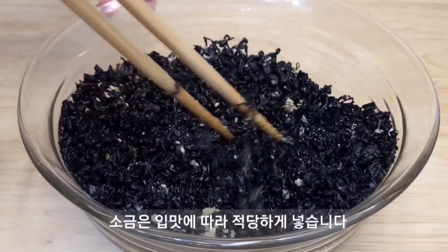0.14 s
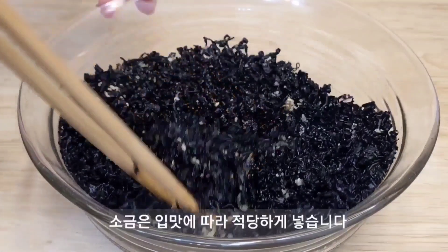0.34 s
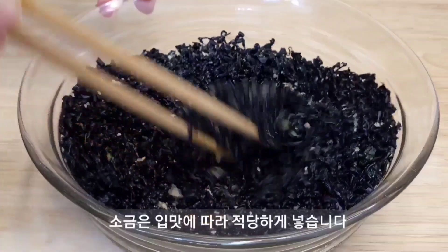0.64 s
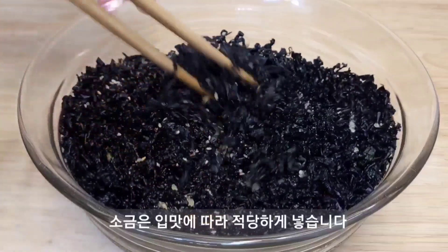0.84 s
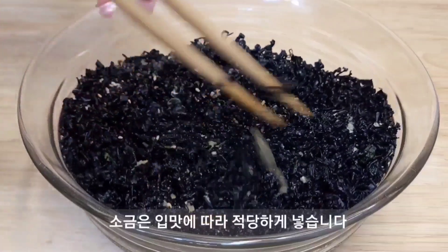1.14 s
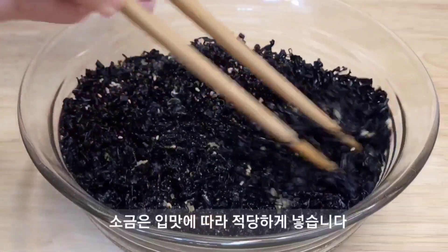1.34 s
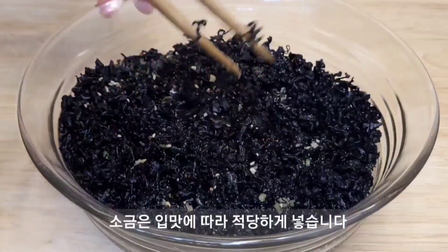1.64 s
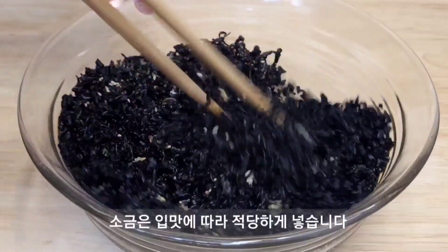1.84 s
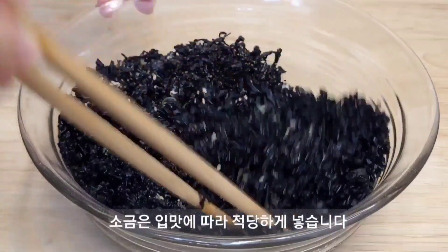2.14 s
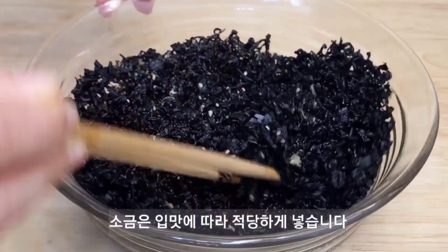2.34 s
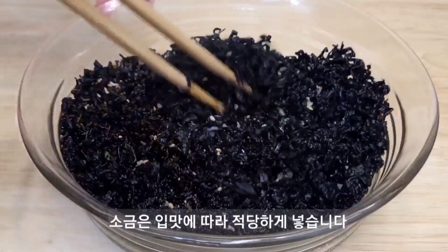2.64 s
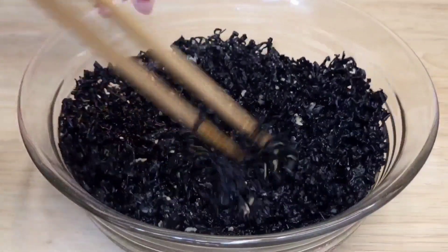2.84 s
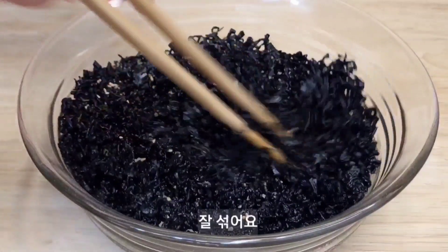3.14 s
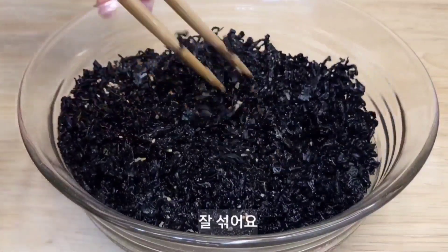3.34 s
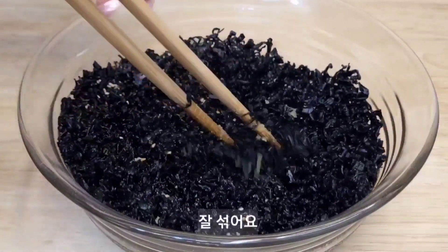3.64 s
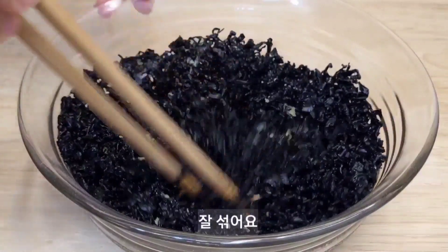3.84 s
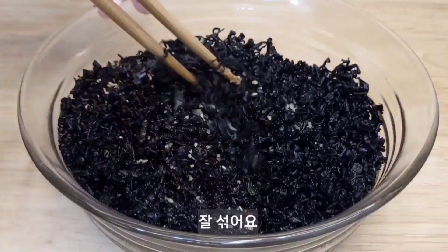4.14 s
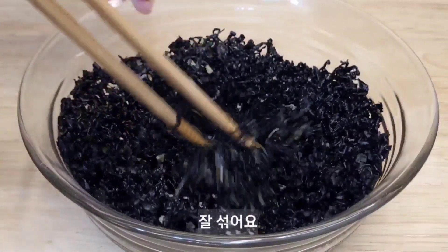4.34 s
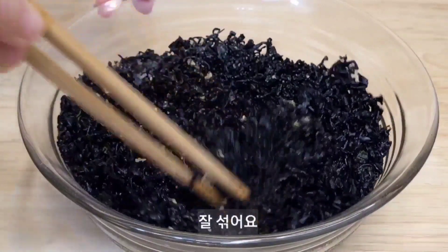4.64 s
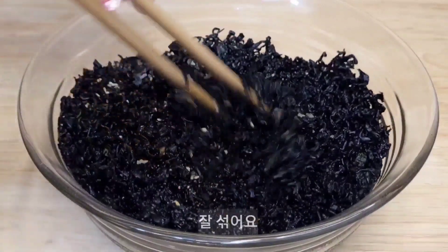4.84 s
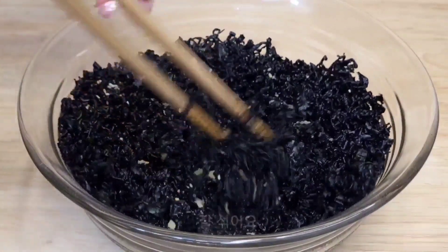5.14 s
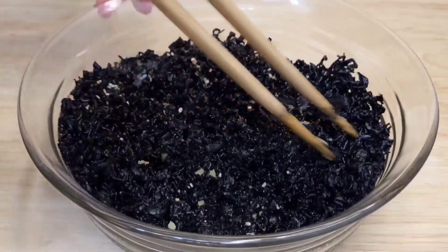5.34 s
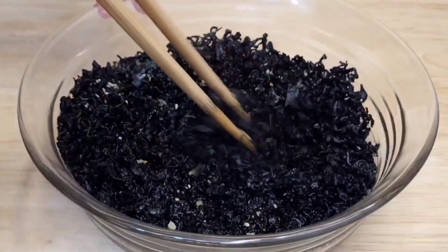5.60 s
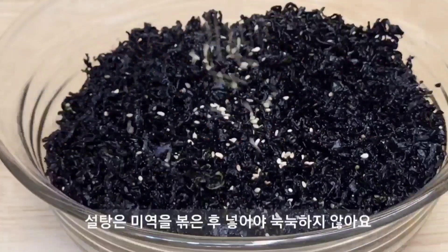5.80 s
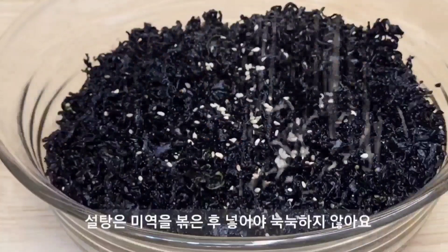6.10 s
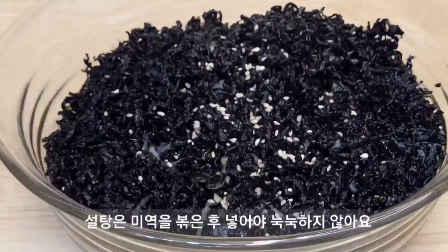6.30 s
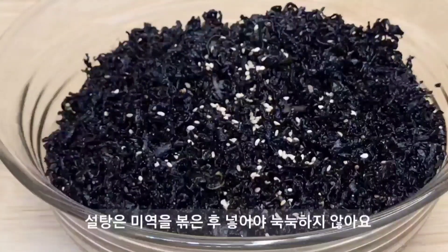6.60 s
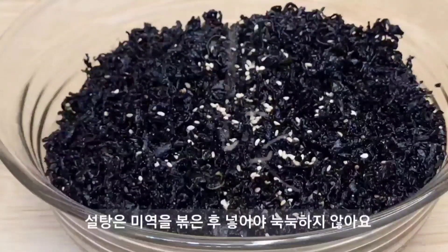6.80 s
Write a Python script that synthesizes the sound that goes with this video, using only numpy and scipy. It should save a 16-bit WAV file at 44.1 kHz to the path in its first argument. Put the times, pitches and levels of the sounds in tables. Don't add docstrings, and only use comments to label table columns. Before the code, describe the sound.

Wooden chopsticks stir brittle dried seaweed in a glass bowl with crackling rustles, clicks and thuds, then fade before a faint sugar patter.

```python
import sys
import numpy as np
from scipy import signal
from scipy.fft import rfft, irfft, next_fast_len
from scipy.io import wavfile
from scipy.ndimage import uniform_filter1d

SR = 44100
rng = np.random.default_rng(int(sys.argv[2]) if len(sys.argv) > 2 else 0)


def makeup_ratio(level_db):
    decades = np.asarray(level_db, float) / 20
    return 10 ** decades


def transcribe(u):
    v = np.clip(np.atleast_2d(u).T, -1, 1)
    q = np.round(v * 32767).astype(np.int16)
    wavfile.write(sys.argv[1], SR, q)


N = 306936


def rms_one(x):
    return x / np.sqrt(np.mean(x ** 2) + 1e-20)


def seconds():
    return np.arange(N) / SR


def scene_two():
    return seconds() > 5.73


def in_time(rows):
    s, *columns = np.transpose(rows)
    return [np.interp(seconds(), s, column) for column in columns]


def at_hz(points, hz):
    point_hz, value = np.array(points).T[:2]
    return np.interp(np.log(hz), np.log(point_hz), value)


def drift(rate):
    r = np.exp(-80 * np.pi * rate / SR)
    slow = signal.lfilter([1], [1, -2 * r, r * r], rng.standard_normal(N // 40 + 2002))[2000:]
    return np.interp(np.arange(N) / 40, np.arange(len(slow)), rms_one(slow))


def resonate(x, hz, width_hz):
    r = np.exp(-np.pi * width_hz / SR)
    gain = (1 - r * r) / 2
    return signal.lfilter([gain, 0, -gain], [1, -2 * r * np.cos(2 * np.pi * hz / SR), r * r], x)


def band_noise_filter(x, low_hz, high_hz):
    return signal.sosfilt(signal.butter(2, [low_hz, high_hz], "band", fs=SR, output="sos"), x)


def grains(per_s, spread_db):
    sizes = makeup_ratio(spread_db * np.minimum(rng.exponential(1, N), 5)) * rng.choice([-1, 1], N)
    return rms_one(sizes * (rng.random(N) < per_s / SR) + 1e-18)


def coloured(pair, spectrum, patchy_db, rate, later=None):
    out = 0
    edges = 25 * 2 ** np.arange(0, 9.5, 1 / 3)
    late = scene_two()
    for k, (low, high) in enumerate(zip(edges, edges[1:])):
        if high > spectrum[0][0] and low < spectrum[-1][0]:
            band = band_noise_filter(pair[k % 2], low, high)
            first_db, second_db = [at_hz(s, np.sqrt(low * high)) for s in (spectrum, later or spectrum)]
            out = out + band * makeup_ratio(np.where(late, second_db, first_db) + patchy_db * drift(rate))
    return np.where(late, out / np.std(out[late]), out / np.std(out[~late]))


def pings(at_s, db, hz, cycles):
    age = np.arange(320, dtype=np.float32) / SR
    hz = hz.astype(np.float32)[:, None]
    decay = np.exp(-hz / cycles * age) * (1 - age / age[-1])
    shapes = makeup_ratio(db)[:, None] * decay * np.sin(2 * np.pi * hz * age)
    where = (at_s * SR).astype(int)[:, None] + np.arange(len(age))
    return np.bincount(where.ravel(), shapes.ravel(), N + len(age))[:N]


def strikes(rows, length_s):
    out = np.zeros(N + SR)
    age = np.arange(SR // 10) / SR
    shapes = rng.standard_normal((len(rows), len(age))) * np.exp(-age / length_s)
    for (s, db, *_), shape in zip(rows, shapes):
        out[round(s * SR):][:len(age)] += makeup_ratio(db) * shape / np.max(np.abs(shape))
    return out[:N]


def louder(a_db, b_db):
    return np.logaddexp(a_db / 4.343, b_db / 4.343) * 4.343


def bursts(start, end, start_db, end_db, rise_db_s, fall_db_s):
    bite_s = 0.051
    s = np.arange(0, N + 64, 64)[:, None] / SR
    progress = np.clip((s - start) / np.maximum(end - start, 1e-3), 0, 1)
    held = start_db + (end_db - start_db) * progress
    lead = np.maximum(start - s, 0)
    db = held - rise_db_s * lead * (1 + lead / bite_s) - fall_db_s * np.maximum(s - end, 0)
    total_db = 10 * np.log10(np.sum(10 ** (db / 10), axis=1) + 1e-14)
    return np.interp(seconds(), s[:, 0], total_db)


# start in seconds, end in seconds, crackle at start in dB,
# crackle at end in dB, brightness in dB.
STROKES = [(0.0, 0.074, -50, -44, -9), (0.093, 0.227, -42.5, -46.5, -6), (0.476, 0.616, -54, -35.5, -6.5),
           (0.748, 0.806, -54, -54.5, -6.5), (0.98, 1.11, -56.5, -48.5, -8), (1.123, 1.278, -42, -61, -7.5),
           (1.423, 1.557, -57, -43.5, -5), (1.568, 1.661, -43.5, -44, -7), (1.904, 2.018, -42, -41.5, -7.5),
           (2.258, 2.378, -45, -35.5, -7), (2.445, 2.473, -56, -51.5, -12.5),
           (2.565, 2.667, -50, -57.5, -4.5), (2.747, 2.852, -56.5, -45, -8),
           (2.882, 2.998, -39.5, -52.5, -7), (3.212, 3.378, -42.5, -44.5, -5.5),
           (3.574, 3.612, -45, -41.5, -8.5), (3.637, 3.751, -39.5, -47.5, -7.5),
           (3.932, 4.011, -54.5, -41.5, -6.5), (4.11, 4.142, -58, -60.5, -6.5),
           (4.29, 4.481, -55, -51, -7.5), (4.74, 4.805, -56, -46, -6), (4.9, 5.048, -70, -76.5, -6),
           (5.137, 5.234, -66.5, -60.5, -10.5), (5.497, 5.617, -91, -73, -5)]
# start in seconds, end in seconds, level in dB.
SLIDES = [
    (0, .04, -51.5),
    (.165, .19, -48.5),
    (0.487, 0.61, -47),
    (1.026, 1.04, -60),
    (1.465, 1.474, -45),
    (1.974, 2.01, -54.5),
    (2.247, 2.322, -47.5),
    (2.38, 2.403, -58),
    (3.195, 3.3, -55),
]
# time in seconds, push on the bowl in dB, sway of the table in dB.
DIGS = [(.12, -56.5, -52), (0.628, -32.5, -42.5), (1.14, -75, -52), (1.6, -59, -60), (1.998, -45, -43.5),
        (2.387, -38, -46), (2.919, -63, -48.5), (3.25, -64, -56), (3.651, -62, -47.5), (4.023, -38, -50),
        (4.4, -62.5, -56), (4.821, -53, -58), (5.23, -78, -69)]


def hand():
    start, end, start_db, end_db, bright_db = np.transpose(STROKES)
    stroke = bursts(start, end, start_db, end_db, rise_db_s=356, fall_db_s=207)
    settle_db = end_db - 21.5
    settle = bursts(end, end, settle_db, settle_db, rise_db_s=356, fall_db_s=30.5)
    bright = np.interp(seconds(), (start + end) / 2, bright_db + 6.5)
    s, push_db, sway_db = np.transpose(DIGS)
    push = bursts(s, s, push_db, push_db, rise_db_s=321.5, fall_db_s=246)
    sway_s = s + 0.007
    sway = bursts(sway_s, sway_s, sway_db, sway_db, rise_db_s=128, fall_db_s=177)
    start, end, db = np.transpose(SLIDES)
    slide = bursts(start, end, db, db, rise_db_s=397, fall_db_s=306)
    return (louder(stroke, settle), bright, louder(push, stroke - 16),
            louder(slide, stroke - 17.5), louder(sway, stroke - 14))


def ringing_flakes(count=14000):
    when, pitch, size = rng.random((count, 3)).T
    size_db = -2.5 * np.log(size + 0.081)
    return rms_one(pings(when * N / SR, size_db, 2500 + 13000 * pitch, cycles=58.0))


# time in seconds, best excited pitch in Hz.
CONTACT = [(0.0, 3900), (0.57, 4950), (0.63, 4060), (1.09, 5080), (1.15, 4270), (2.38, 5170), (2.49, 4190),
           (2.55, 5420), (2.96, 4320), (3.97, 5260), (4.08, 4130), (4.26, 5370), (4.46, 4040), (4.71, 5470),
           (4.89, 3980), (5.12, 5190), (5.17, 4730), (5.66, 4740)]
# frequency in Hz, width in Hz, level in dB.
GLASS = [(2988, 58, -6), (4088, 73, 0), (4474, 48, -5.5), (5805, 330, -3.5), (6660, 200, -8),
         (8120, 340, -11.5)]


def glass(force, favour_db):
    best_hz, = in_time(CONTACT)
    out = 0
    for k, (hz, width, db) in enumerate(GLASS):
        near = np.exp(-(np.log(hz / best_hz) / 0.19) ** 2)
        drive = force * makeup_ratio(favour_db * near + 0.5 * drift(3.4))
        out = out + (-1) ** k * makeup_ratio(db) * resonate(drive, hz, width)
    return out


# frequency in Hz, density in dB per Hz.
CRACKLE = [(760, -69), (1300, -33), (1550, -3), (1690, -11), (2010, -15.5), (2960, -5.5), (3560, -2.5),
           (4120, -3.5), (5020, -9.5), (5810, -4.5), (7850, -4), (9100, -6.5), (11400, -15.5), (14400, -21)]
# frequency in Hz, width in Hz, level in dB.
RUBBED = [(1709, 29, -0.5), (2930, 37, -5.5), (4593, 70, -4.5)]


def stirring(crackle_db, bright_db, rub_db):
    clumps = makeup_ratio(1.04 * drift(40.0))
    flakes = ringing_flakes()
    snaps = [(grains(8000.0, spread_db=2.5) + makeup_ratio(-9) * flakes) * clumps for _ in range(2)]
    rustle = coloured(snaps, CRACKLE, patchy_db=1.9, rate=8.9)
    rustle = rustle + makeup_ratio(-5.5) * rms_one(glass(snaps[0], favour_db=9.0))
    top = signal.sosfilt(signal.butter(4, 7200, "high", fs=SR, output="sos"), rustle)
    body = makeup_ratio(crackle_db - .3) * (rustle - top)
    body = body + makeup_ratio(crackle_db + bright_db - .3) * rms_one(top)
    sliding = makeup_ratio(rub_db + 20) * snaps[1]
    return body + sum(makeup_ratio(db) * resonate(sliding, hz, width) for hz, width, db in RUBBED)


# frequency in Hz, width in Hz, level in dB.
TABLE = [(128, 11.3, 1), (216.4, 14, -2), (241, 24, -5), (368, 13, -3), (467.6, 12, 2.5), (600, 70, -13),
         (882.4, 43, -5.5), (1028, 11.7, -7), (1085, 7, -3.5), (1131, 120, -12.5)]
# time in seconds, peak in dB.
KNOCKS = [
    (0.598, -5.5),
    (0.612, -37.5),
    (1.117, -48),
    (1.972, -33),
    (2.374, -54),
    (3.586, -41),
    (4.009, -18.5),
    (4.81, -55),
]


def table_modes(force):
    return sum((-1) ** k * makeup_ratio(db) * resonate(force, hz, width) for k, (hz, width, db) in enumerate(TABLE))


def table(push_db):
    slips = grains(1500.0, spread_db=4.0)
    blows = strikes(KNOCKS, 0.025)
    hard = np.clip((push_db + 70.5) / 15, 0, 1)
    soft = band_noise_filter(slips, 150, 1500)
    rocking = hard * rms_one(table_modes(slips)) + makeup_ratio(9) * (1.2 - hard) * soft
    return signal.lfilter([.2], [1, -.8], makeup_ratio(push_db + 2.0) * rocking + makeup_ratio(7.0) * table_modes(blows))


# time in seconds, level in dB.
ROOM_LEVEL = [
    (0, -59.5),
    (3.9, -61),
    (4.3, -66),
    (4.7, -70),
    (5.0, -73.5),
    (5.68, -82.5),
]
# time in seconds, sugar patter in dB, room in dB.
SUGAR = [
    (5.79, -97.5, -79.5),
    (5.93, -69.5, -59.5),
    (6.092, -66, -60.5),
    (6.2, -68.5, -62),
    (6.32, -69, -59),
    (6.4, -71.5, -58.5),
    (6.96, -73.5, -60),
]
# frequency in Hz, density in dB per Hz.
QUIET_ROOM = [(15, -31), (25, -13), (43, -3), (106, 1.5), (185, -8), (278, -6), (486, -11), (1300, -21),
              (2500, -31), (3250, -43.5), (5500, -120)]
# frequency in Hz, density in dB per Hz.
ROOM = [(15, -40), (25, -14.5), (86, 1), (193, -14.5), (262, -8.5), (294, -15), (324, -11), (515, -20),
        (612, -19.5), (954, -25.5), (2500, -36), (3250, -72), (5500, -120)]


def rumble(sway_db):
    _, room_db = in_time(SUGAR)
    quiet_db, = in_time(ROOM_LEVEL)
    level = np.where(scene_two(), makeup_ratio(room_db + 1.6), makeup_ratio(louder(quiet_db, sway_db) + 2.33))
    return level * coloured(rng.standard_normal((2, N)), QUIET_ROOM, patchy_db=3.5, rate=9.0, later=ROOM)


# frequency in Hz, density in dB per Hz.
PATTER = [(590, -34.5), (1000, -11.5), (3460, -5.5), (3980, -5), (5810, -5), (7150, -7), (14900, -8),
          (15600, -10)]


def hiss_and_sugar():
    patter_db, _ = in_time(SUGAR)
    fader, = in_time(FADER)
    sugar = [.7 * rng.standard_normal(N) + .45 * grains(2500.0, spread_db=4.0) for _ in range(2)]
    bright = coloured(sugar, PATTER, patchy_db=2.0, rate=17.0)
    return np.where(scene_two(), makeup_ratio(patter_db + 3.0), makeup_ratio(-75.5) * fader) * bright


# time in seconds, peak in dB, ringing frequency in Hz.
TICKS = [(0.0702, -30, 4280), (0.5984, -26, 4050), (0.6144, -24, 4070), (1.1084, -28, 4510),
         (1.4115, -44, 4500), (1.4696, -31, 4500), (1.9016, -31, 4510), (2.2308, -39, 4500),
         (2.2468, -35, 4490), (2.2618, -28, 4820), (2.2674, -28, 4250), (2.3281, -26, 5920),
         (2.3444, -27, 6190), (2.3615, -25, 5750), (2.3755, -21, 4010), (2.5701, -26, 5880),
         (3.5404, -41, 5820), (3.5964, -28, 3630), (3.9539, -28, 5660), (4.0103, -25, 4060),
         (4.7456, -39, 5710)]


def ticks():
    s, db, hz = np.transpose(TICKS)
    crack = band_noise_filter(strikes(TICKS, .0006), 3000, 11000)
    return makeup_ratio(-3) * crack + pings(s, db - 9, hz, cycles=22.0)


def kitchen(x):
    t60_s = 0.12
    age = np.arange(SR // 2) / SR
    tails = rng.standard_normal((2, len(age))) * makeup_ratio(-60 * age / t60_s) * (age > .004)
    tails = signal.lfilter([.5], [1, -.55], tails)
    return signal.fftconvolve(x[None], tails / np.sqrt(np.sum(tails[0] ** 2)), axes=1)[:, :N]


# time in seconds, frequency in Hz, level in dB.
MOTOR = [
    (1.05, 289, -120),
    (1.1, 287, -83),
    (1.14, 291.2, -60.5),
    (1.7, 295, -62),
    (2.2, 293.4, -67.5),
    (2.35, 308, -104),
    (2.5, 305, -120),
]


def motor():
    hz, db = in_time(MOTOR)
    level = makeup_ratio(db + 4.0 + 0.61 * drift(17.0))
    return level * np.sin(2 * np.pi * np.cumsum(hz + 0.3 * drift(5.7)) / SR)


# time in seconds, peak in dB, frequency in Hz.
BUMPS = [(5.878, -48, 76.6), (5.929, -59, 85), (6.0, -49, 82.5), (6.239, -48.5, 64), (6.301, -42.5, 84),
         (6.439, -48, 88), (6.474, -40.5, 90), (6.578, -54, 91), (6.638, -41.5, 77.4), (6.732, -41, 89.7),
         (6.797, -45.5, 80.7), (6.907, -48.5, 73.6)]


def bumps():
    out = np.zeros(N + SR)
    age = np.arange(SR // 5) / SR
    envelope = (1 - np.exp(-age / 0.0059)) * np.exp(-age / 0.015)
    for s, db, hz in BUMPS:
        out[round(s * SR):][:len(age)] += makeup_ratio(db + 2.5) * envelope * np.sin(2 * np.pi * hz * age)
    return out[:N]


# frequency in Hz, likeness from 0 to 1.
LIKENESS = [(60, .99), (1000, .985), (4500, .98), (8000, .94), (13000, .8)]


def microphones(x, tilt_db):
    size = next_fast_len(N + SR)
    hz = np.maximum(np.arange(size // 2 + 1) * SR / size, 10)
    alike = np.clip(at_hz(LIKENESS, hz), 0, .999)
    scatter = rng.standard_normal(12000) * np.exp(-np.arange(12000) / 2000)
    side = rfft(scatter / np.sqrt(np.sum(scatter ** 2)), size) * np.sqrt((1 - alike) / 2)
    low_cut = hz ** 2 / (hz ** 2 + 29.0 ** 2)
    pair = irfft(rfft(x, size) * low_cut * np.array([1 + side, 1 - side]), size)[:, :N]
    return pair * makeup_ratio(tilt_db / 2 * np.array([[1], [-1]]))


def scene():
    bowl_tilt_db, room_tilt_db = -4.6, -0.5
    crackle_db, bright_db, push_db, rub_db, sway_db = hand()
    stirred = stirring(crackle_db, bright_db, rub_db)
    struck = table(push_db) + ticks()
    room = rumble(sway_db) + hiss_and_sugar() + motor() + bumps()
    shaken = np.where(scene_two(), .7, np.clip((push_db + 70) / 12, 0, 1))
    room_tilt_db = room_tilt_db + shaken * (bowl_tilt_db - room_tilt_db)
    bowl = microphones(stirred + struck, bowl_tilt_db)
    return bowl + microphones(room, room_tilt_db) + makeup_ratio(-21.5) * kitchen(struck)


# frequency in Hz, level in dB per bin.
JOINT = [(1200, -40), (1400, -86), (1720, -60), (2000, -92), (2400, -84), (2900, -66), (3500, -74),
         (5200, -77), (6500, -74), (7500, -64), (12000, -60)]


def joint_stereo(x):
    middle_side = np.array([x[0] + x[1], x[0] - x[1]]) / 2
    hz, s, (mid, side) = signal.stft(middle_side, SR, nperseg=2048)
    level_db = 10 * np.log10(uniform_filter1d(np.abs(mid) ** 2, size=25, axis=0) + 1e-20)
    fade_db = 20 * np.log10(np.interp(s, *np.transpose(FADER)) + .15)
    kept = level_db < at_hz(JOINT, hz + 1)[:, None] + fade_db + rng.normal(0, 2, len(s))
    lost = signal.istft(side * ~kept, SR, nperseg=2048)[1][:N]
    return x - lost * [[1], [-1]]


def top_cut(x):
    return signal.sosfilt(signal.butter(12, 15780, fs=SR, output="sos"), x)


# time in seconds, gain from 0 to 1.
FADER = [
    (0, 1),
    (4.2, 1),
    (5.664, .06),
    (5.672, 0),
    (5.781, 0),
    (5.785, .03),
    (6.2, 1),
    (6.96, 1),
]


def record(dry):
    fader, = in_time(FADER)
    steps = 2048
    wet = np.floor((dry - .0003 * fader) * (fader > 1e-4) * steps) / steps
    wet = signal.sosfilt(signal.ellip(12, .5, 70, 15550, fs=SR, output="sos"), wet)
    mix = joint_stereo(wet)
    return top_cut(mix)


dry = scene()
out = record(dry)
transcribe(out)
```